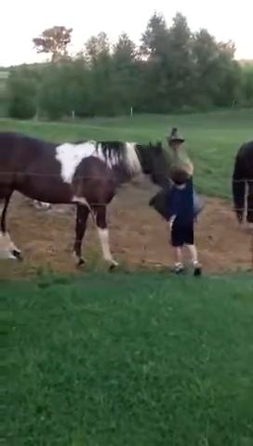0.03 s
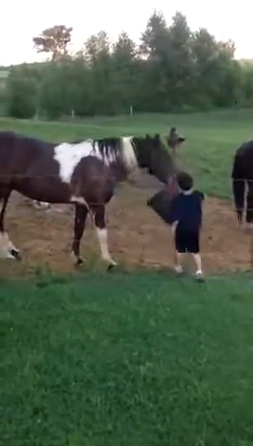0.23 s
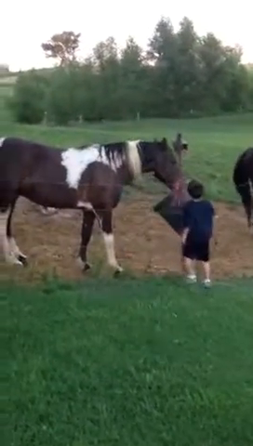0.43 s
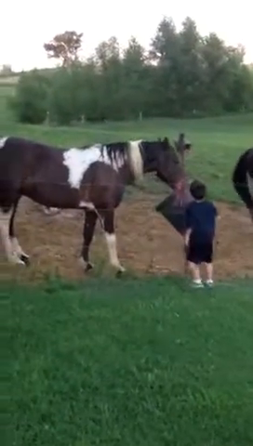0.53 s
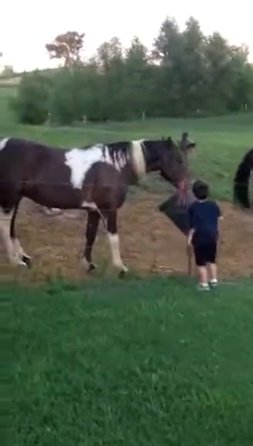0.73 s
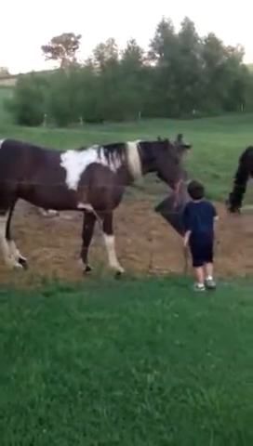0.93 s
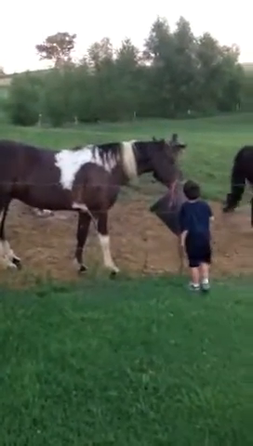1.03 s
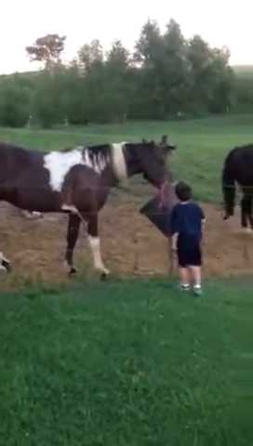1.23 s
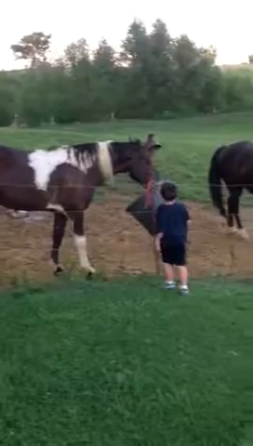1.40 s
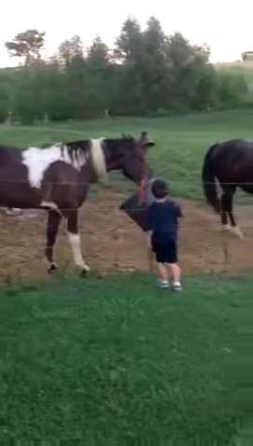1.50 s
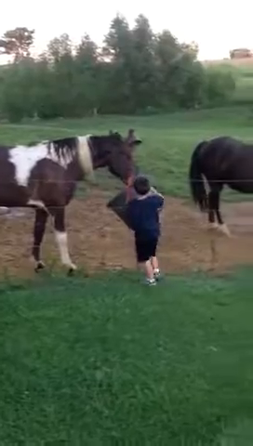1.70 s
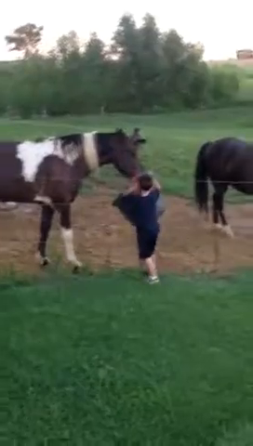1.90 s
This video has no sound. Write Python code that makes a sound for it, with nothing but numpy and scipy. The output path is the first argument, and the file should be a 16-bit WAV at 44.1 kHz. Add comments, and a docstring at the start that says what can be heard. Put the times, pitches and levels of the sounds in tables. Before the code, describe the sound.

Six bright clangs come from a small bell outdoors, the second loudest, each ringing into the next. Faint footsteps on turf, light rattles and one tiny squeak lie underneath, heard from a short distance in still country air.

```python
"""Small bell on a paddock post

Quiet country air, one small microphone within earshot of the post. The metal bell is rung six times;
the clapper lands at a new place on the rim each time, so the paired modes beat differently. Between
blows the mount knocks and its pivot squeaks once. Soft steps on turf and faint reflections lie behind."""
import sys
import numpy as np
from scipy import signal
from scipy.fft import rfft, irfft
from scipy.io import wavfile

SR = 44100
rng = np.random.default_rng(int(sys.argv[2]) if len(sys.argv) > 2 else 0)


def master_out(mix):
    """Clip the mix to full scale and print it as 16-bit PCM to the path in sys.argv[1]."""
    frames = np.transpose(np.atleast_2d(mix))
    ceiling = np.clip(frames, -1, 1)
    pcm = np.round(ceiling * 32767).astype(np.int16)
    wavfile.write(sys.argv[1], SR, pcm)


N = 85995
TIME = np.arange(N) / SR
CONTACT_S = 0.00058   # rise time of a hard contact

# clapper blows: t/s, strength/dB, tilt/(dB per octave), extra top/dB, place on the rim/degrees,
# sparkle of the highest modes/dB, depth of the slow throb/dB
STRIKES = [(0.2242, -4, -3, 16.5, 55.7, 0, -4), (0.5185, 3, 1.85, -15, 40.78, 1, 0),
           (0.8303, -8.5, -3, -3, 16.5, -9, -2), (1.1354, -3, -0.5, -1.5, 127.3, 1, 5),
           (1.4138, -3.5, -1.06, -1, 79.64, -2, 2), (1.7041, -9.5, -6.5, 7.5, 86.1, -6, -2.5)]


def from_db(db):
    """Decibels to gain."""
    return 10 ** (np.asarray(db) / 20)


def drift(rate_hz):
    """Slow random wander with spread 1: noise smoothed above rate_hz."""
    hop, settle = 40, 2000
    pole = np.exp(-2 * np.pi * rate_hz * hop / SR)
    white = rng.standard_normal(N // hop + settle + 2)
    slow = signal.lfilter([1], [1, -2 * pole, pole * pole], white)[settle:]
    return np.interp(np.arange(N) / hop, np.arange(len(slow)), slow / slow.std())


def noise(spectrum):
    """Noise of rms 1, coloured by rows of f/Hz, relative level/dB."""
    hz, db = np.transpose(spectrum)
    bin_hz = np.maximum(np.arange(N // 2 + 1) * SR / N, 1)
    colour = from_db(np.interp(np.log(bin_hz), np.log(hz), db))
    x = irfft(rfft(rng.standard_normal(N)) * colour, N)
    return x / x.std()


def burst(start, rise, t60):
    """Envelope of a blow: a quick rise, then a steady decay."""
    age = np.maximum(TIME - start, 0)
    return np.minimum(age / max(rise, 1 / SR), 1) * np.exp(-np.log(1000) * age / t60)


def ring(start, hz, t60, clock=TIME):
    """One struck mode, a decaying sine; an uneven clock bends its pitch."""
    age = clock - np.interp(start, TIME, clock)
    return burst(start, CONTACT_S, t60) * np.sin(2 * np.pi * hz * age)


def air():
    """Soft hiss and rumble of the open paddock, slowly sinking."""
    # outdoor spectrum: f/Hz, relative level/dB
    spectrum = [(25, -26), (55, -62), (85, 2), (120, 0), (170, 1.5), (300, -9), (550, -10), (850, -13.5),
                (2000, -14.5), (3800, -11.5), (4800, -3), (8000, -8.5), (11000, -21), (15500, -24.5)]
    start_db, fall_db_per_s = -54.5, 1
    return from_db(start_db - fall_db_per_s * TIME) * noise(spectrum)


def steps():
    """Dull thuds and scuffs on turf, each a swell of noise around one frequency."""
    # footfalls: t/s, level/dB, f/Hz
    footfalls = [(.185, -47.5, 640), (.37, -45, 165), (.44, -42.5, 560), (0.472, -45.5, 165),
                 (0.549, -55, 149), (1.73, -58, 159)]
    out = np.zeros(N)
    for start, db, hz in footfalls:
        thud = noise([(hz / 2, -35), (hz, 0), (hz * 2, -35), (hz * 10, -70)])
        out += from_db(db) * burst(start, rise=0.024, t60=0.18) * thud
    return out


def pivot():
    """The pivot gives one brief, slightly unsteady squeak."""
    # the squeak: t/s, length/s, f/Hz
    squeak = (.742, .072, 2212)
    start, length, hz = squeak
    swell = np.sin(np.pi * np.clip((TIME - start) / length, 0, 1))
    pitch_hz = hz * (1 + 0.0024 * drift(rate_hz=40))
    return from_db(-38.5) * swell * np.sin(2 * np.pi * np.cumsum(pitch_hz) / SR)


def mount():
    """Play in the mount gives a knock, then a chatter of tiny contacts; the blows ring its modes too."""
    # knocks and their rattle: t/s, level/dB, rattle rise/s, rattle t60/s
    knocks = [(0.142, -41.5, 0.00067, 0.16), (0.446, -48.5, 0.0049, 0.1), (.729, -41, 0.0033, 0.34),
              (0.993, -52, 0.0083, 0.15), (1.268, -51.5, 0.0027, 0.39)]
    # modes of the mount: f/Hz, relative level/dB, t60/s
    modes = [(165, -17, 0.26), (514, -6.5, 0.12), (1108.8, 0, 0.32), (1445, -7.5, 0.19), (1825, 5, 0.018),
             (2246, -5, 0.25), (2678, -6, 1), (3310, -9, 0.14), (4300, -7, 0.9), (5200, -13, .1),
             (6420, 1, 0.22), (9010, -7, .12)]
    # spectrum of the rattle: f/Hz, relative level/dB
    rattle_spectrum = [(150, -17), (500, -1.5), (800, -4), (1800, 1), (3000, 0), (4500, 0.5), (6000, -3),
                       (9000, -4), (11000, -14), (15500, -39)]
    blow_db, contacts_per_s, chatter_db = -46, 310, -7
    hits = [row[:2] for row in knocks] + [(start, blow_db) for start, *_ in STRIKES]
    knocking = sum(from_db(db + mode_db) * ring(start, hz, t60)
                   for start, db in hits for hz, mode_db, t60 in modes)
    shaking = sum(from_db(db) * burst(start, rise, t60) for start, db, rise, t60 in knocks)
    contacts = shaking * rng.standard_normal(N) * (rng.random(N) < contacts_per_s / SR)
    body = sum(from_db(mode_db) * ring(0, hz, t60) for hz, mode_db, t60 in modes)
    chatter = from_db(chatter_db) * signal.fftconvolve(contacts, body)[:N]
    return knocking + chatter + shaking * noise(rattle_spectrum)


def echoes(ringing):
    """Weak, dense reflections from ground, fence and animals make the shimmer uneven."""
    response = rng.standard_normal(N) * burst(start=0.0093, rise=CONTACT_S, t60=0.21)
    return from_db(-9.5) * signal.fftconvolve(ringing, response / np.linalg.norm(response))[:N]


def clapper():
    """The short crack of metal on metal and its faint scatter from ground and trees."""
    # spectrum of the contact: f/Hz, relative level/dB
    crack_spectrum = [(300, -7.5), (900, -25), (2000, -0.5), (3300, 1.5), (5000, 2), (8500, -1),
                      (10500, -6), (11500, -39), (15500, -36)]
    # spectrum of the scatter: f/Hz, relative level/dB
    scatter_spectrum = [(150, -16), (300, -37), (500, 8.5), (750, -7), (1400, -2), (2300, 0), (3200, -8.5),
                        (5500, 11.5), (9000, -8.5), (11500, -19), (15500, -36)]
    crack, scatter = np.zeros(N), np.zeros(N)
    for start, strength_db, *_ in STRIKES:
        force_db = 0.3 * strength_db   # the crack follows the blow's strength only weakly
        crack += from_db(force_db - 29) * burst(start, CONTACT_S, t60=0.039)
        scatter += from_db(force_db - 41.5) * burst(start, rise=0.0033, t60=0.41)
    return crack * noise(crack_spectrum) + scatter * noise(scatter_spectrum)


def bell():
    """A blow feeds each mode by how near it lands to an antinode, and chokes the ring before it."""
    # the bell's modes, many in close pairs that beat: f/Hz
    pitches = [1097, 2610, 2633, 4268, 5147, 5191, 5973, 6013, 6420, 7632, 7670, 8992, 9031, 9870, 10170,
               10410, 10465, 10763, 12030, 12100, 13567, 14390, 14470]
    # the same modes in order: level/dB, t60/s, waves round the rim, place of an antinode/degrees
    modes = [(-32.5, 1.214, 2, 53.5), (-26, 0.76, 3, 38.8), (-19.5, 0.74, 3, 15.2), (-12.5, 0.72, 4, 11),
             (-40.5, 0.67, 3, 41), (-25.5, 0.21, 3, 1.3), (-26, 0.61, 4, 8.2), (-26.5, 0.46, 4, 24),
             (-10.5, 0.33, 5, 25.2), (-29.5, 0.27, 5, 4.5), (-8, 0.16, 5, 19.86), (-16.5, 0.35, 6, 26.86),
             (-19, .35, 6, 31.3), (-41.5, 0.21, 4, 35), (-37, 0.19, 2, 37), (-33.5, 0.18, 6, 11),
             (-34, 0.35, 6, 6.5), (-25, 0.15, 3, 1.4), (-55, .34, 7, 25), (-53, 0.45, 7, 28),
             (-46.5, 0.19, 7, 2), (-51, 0.24, 8, 25), (-53, 0.21, 7.4, 16)]
    # the three lowest tones (the middle one a pair) dip and swell as the bell swings: t/s, gain/dB
    hum_swing = [(.23, -2.5), (.3, -1.5), (.51, 0), (.53, -2.5), (.6, 2), (.64, -15.5), (.68, 8.5),
                 (.81, 9), (.84, 2), (.9, 6), (.96, -13), (1.0, -11), (1.14, -1.5), (1.3, -4.5), (1.4, -12),
                 (1.43, -0.5), (1.95, -3.5)]
    middle_swing = [(.23, -7.5), (.38, 6.5), (0.502, 13), (0.528, 0.5), (.8, -2.5), (.84, 3), (1.022, 3),
                    (1.1, -27), (1.138, -2.5), (1.272, 1.5), (1.33, -5.5), (1.36, -11), (1.4, -8.5),
                    (1.43, -4.5), (1.68, -7), (1.721, 0.5), (1.95, 1.5)]
    high_swing = [(.23, 2), (0.391, 3), (0.451, -8), (0.479, 4.5), (.51, 10.5), (0.523, -6.5), (0.578, 2),
                  (0.799, 3.5), (1.129, 0.5), (1.3, 6.5), (1.449, 8), (1.495, -1), (1.532, 5), (1.688, 6.5),
                  (1.708, -2), (1.749, 3), (1.95, 4.5)]
    tilt_pivot_hz, top_hz, sparkle_hz = 4000, 10000, 11500
    waver_hz, waver_db, pitch_bend = 10.2, 2.5, 0.00056
    choke_s, bloom_db, bloom_s = 0.0028, -2, 0.016
    chokes = [np.clip(1 - (TIME - start) / choke_s, 0, 1) for start, *_ in STRIKES] + [1]
    clock = TIME + np.cumsum(pitch_bend * drift(waver_hz)) / SR
    swings_db = [np.interp(TIME, *np.transpose(curve))
                 for curve in (hum_swing, middle_swing, middle_swing, high_swing)]
    # the lowest mode hums faintly until the first blow
    out = from_db(-64) * np.sin(2 * np.pi * pitches[0] * TIME) * chokes[0]
    for k, (hz, (mode_db, t60, waves, antinode)) in enumerate(zip(pitches, modes)):
        mode = np.zeros(N)
        for strike, choke in zip(STRIKES, chokes[1:]):
            start, strength_db, tilt, top_db, place, sparkle_db, throb_db = strike
            rim_shape = np.cos(round(waves) * np.radians(place - antinode))
            share = np.hypot(rim_shape, 0.12)   # a little is fed in even on a node
            if k == 1:   # the second mode starts against its twin and sets how deeply the pair throbs
                share *= -from_db(throb_db)
            brightness_db = tilt * np.log2(hz / tilt_pivot_hz) + top_db * (hz > top_hz)
            blow_db = sparkle_db if hz > sparkle_hz else strength_db + brightness_db
            mode += from_db(mode_db + blow_db) * share * ring(start, hz, t60, clock) * choke
        # the low modes follow the swing, the upper ones waver at random
        out += mode * from_db(swings_db[k] if k < len(swings_db) else waver_db * drift(waver_hz))
    # each ring starts a little short of full strength and opens out
    onsets = sum((TIME > start) * np.exp(-np.abs(TIME - start) / bloom_s) for start, *_ in STRIKES)
    return out * from_db(bloom_db * onsets)


def scene():
    """The bell and the paddock around it, in mono at one microphone."""
    ringing = bell()
    return (ringing + echoes(ringing) + clapper() + mount() + pivot() + steps() + air())[None]


def record(dry):
    """The small microphone loses the deep bass; the top is cut steeply."""
    low_cut_hz, high_cut_hz = 93, 15400
    low_cut = signal.butter(3, low_cut_hz, "high", fs=SR, output="sos")
    high_cut = signal.ellip(10, 0.1, 80, high_cut_hz, fs=SR, output="sos")
    return signal.sosfilt(high_cut, signal.sosfilt(low_cut, dry))


dry = scene()
out = record(dry)
master_out(out)
```